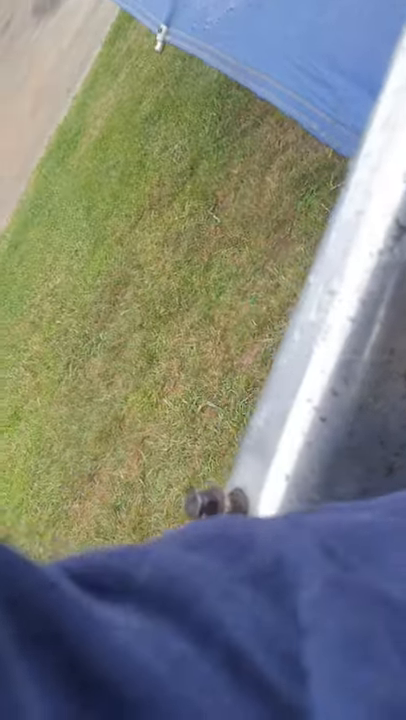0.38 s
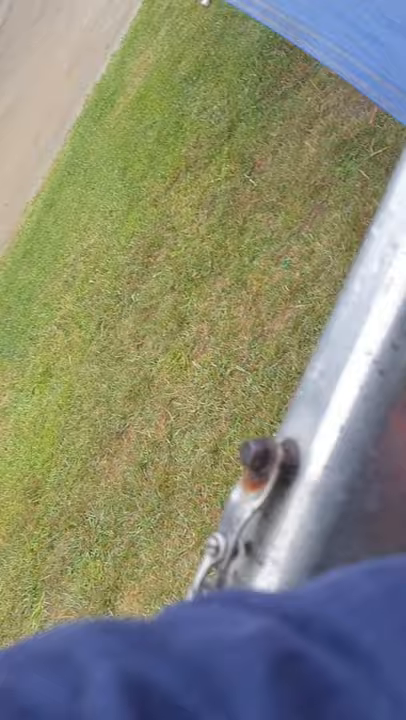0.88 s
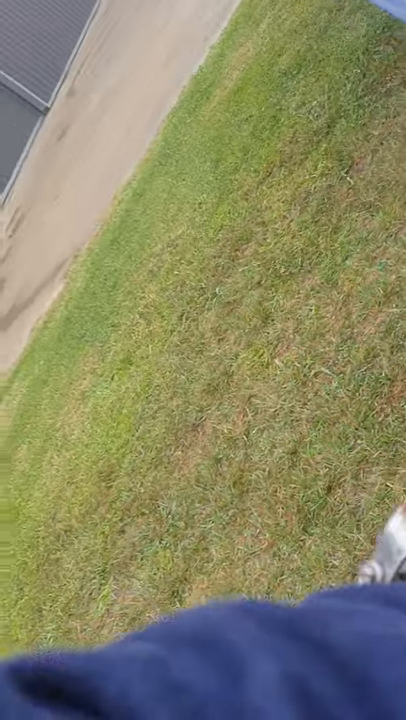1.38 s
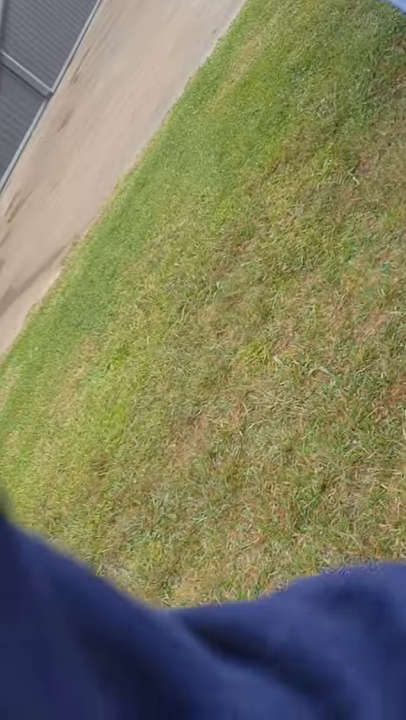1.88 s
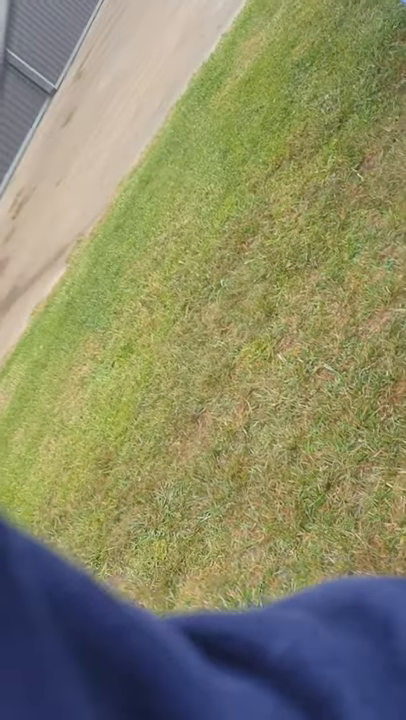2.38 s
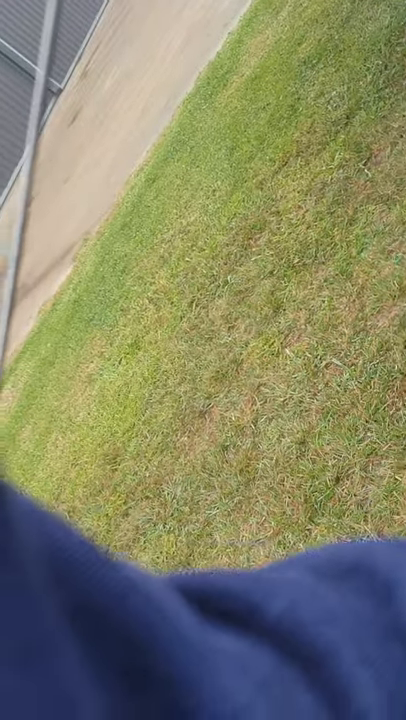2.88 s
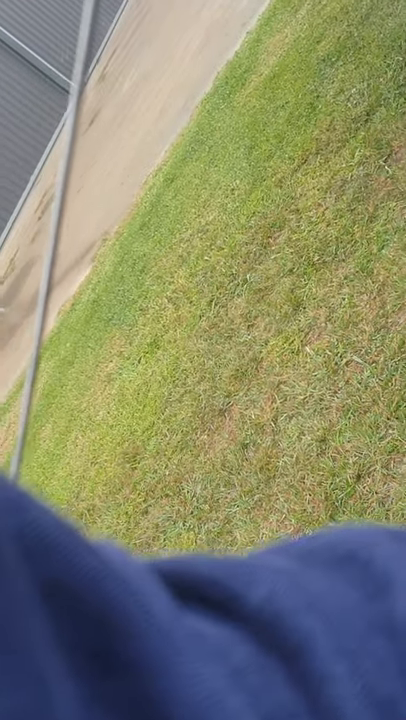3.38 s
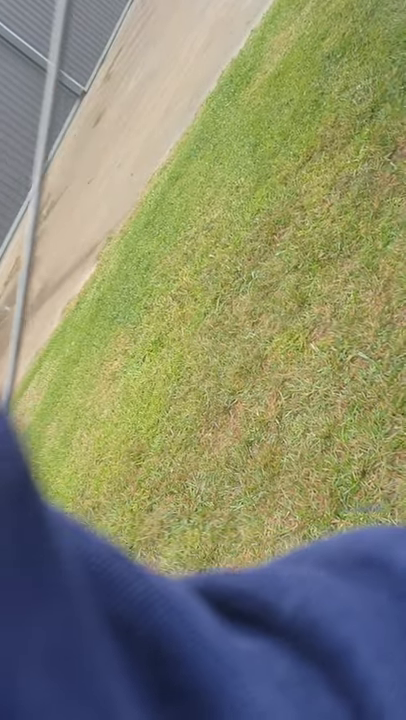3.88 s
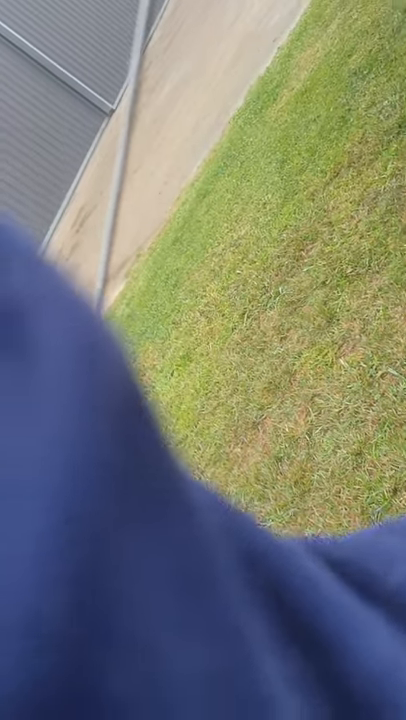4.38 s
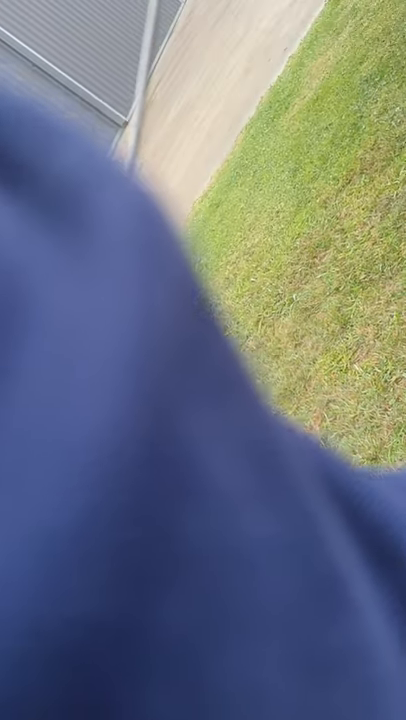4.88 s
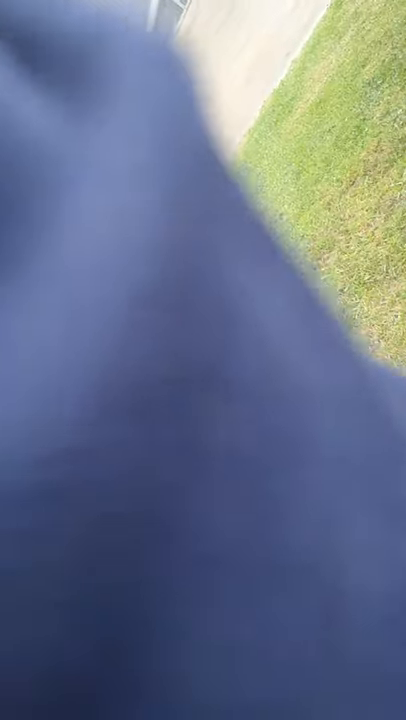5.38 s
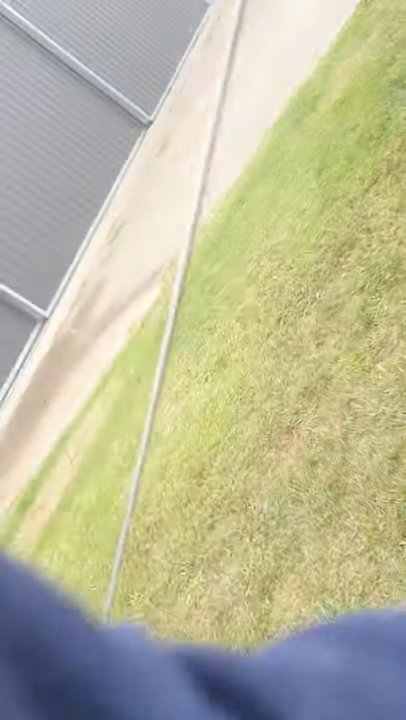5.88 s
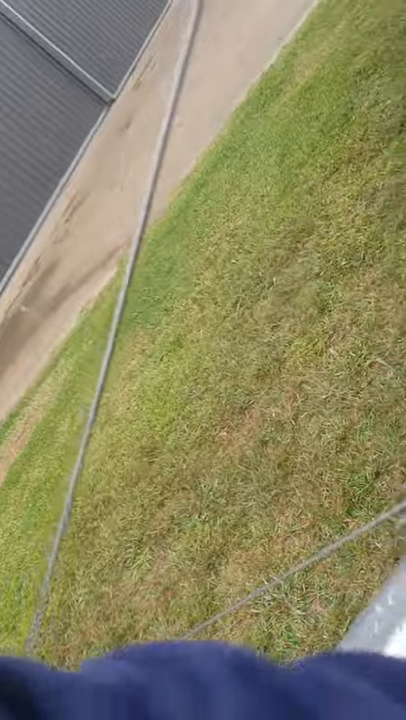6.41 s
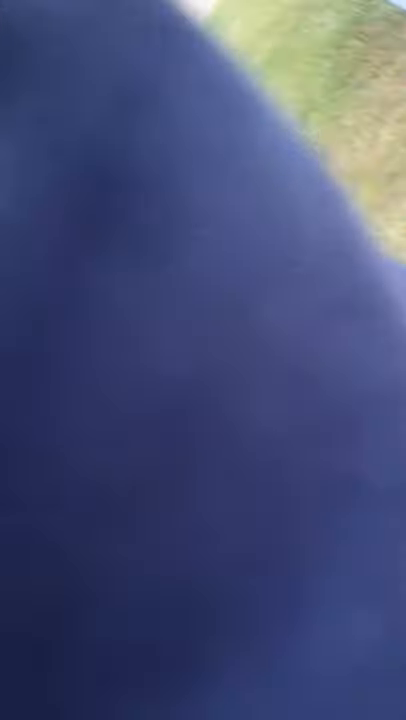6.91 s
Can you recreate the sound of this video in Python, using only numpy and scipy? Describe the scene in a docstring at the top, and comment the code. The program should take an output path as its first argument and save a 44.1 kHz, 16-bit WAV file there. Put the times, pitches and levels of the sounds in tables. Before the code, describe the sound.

Outdoors, a constant low motor hum with a rattling cover runs under bumps, creaky crackles and sleeve rustle, then sharp bright clinks near the end.

```python
"""Small engine and a handled metal frame

A small four-stroke engine drones steadily across a lawn, as cosines on its shaft orders, with a puff of gas each turn.
The puffs, enveloped noise, rattle a loose cover. Someone wearing the recorder handles a metal tube frame:
the recorder's case creaks in slips (ringing modes and noise bursts) and a sleeve rubs past the ports (swelling noise).
A small metal fitting clinks close to the left port (high modes together with a crack of noise).
High noise swells and fades, over a steady machine and outdoor hiss.
"""
import sys
import numpy as np
from scipy import signal
from scipy.fft import rfft, irfft
from scipy.io import wavfile
from scipy.ndimage import uniform_filter1d

SR = 44100
rng = np.random.default_rng(int(sys.argv[2]) if len(sys.argv) > 2 else 0)


def voltage_ratio(level):
    """Linear amplitude factor for a level in decibels (scalar or array-like)."""
    return 10 ** (np.asarray(level, float) / 20)


def transcribe(u):
    """Save the signal u as a 16-bit wav file named by the first command-line argument.

    u: samples, shape (n,) or (channels, n), limited to [-1, 1]; the rate is SR.
    q: integer samples, one column per channel.
    """
    v = np.clip(np.atleast_2d(u).T, -1, 1)
    q = np.round(v * 32767).astype(np.int16)
    wavfile.write(sys.argv[1], SR, q)


N = 309574
T = np.arange(N) / SR
HZ = np.maximum(np.linspace(0, SR / 2, 2049), 1)  # frequency grid of the noise filters

# Every *_COLOUR table is a relative noise spectrum: frequency_hz, density_db.
# Every *_SIDE table is the part unrelated between the ports: frequency_hz, side_re_mid_db.
# Every *_PAN table is the balance of the ports: frequency_hz, left_minus_right_db.

# Shaft speed: time_s, turns_hz
SHAFT_SPEED = [(0.0, 47.74), (0.35, 47.79), (1.05, 47.71), (1.4, 47.8), (2.1, 47.73), (2.8, 47.87),
               (3.15, 47.84), (3.5, 47.99), (4.2, 48.01), (4.55, 47.82), (4.9, 47.95), (5.6, 47.99),
               (5.95, 47.96), (6.3, 48.16), (7.0, 48.15)]
# Drone levels: time_s, first_order_db, second_order_db, upper_orders_db
ORDER_LEVELS = [(0.0, -30, -27.5, -39.5), (1.0, -27.5, -25.5, -33.5), (1.5, -27, -25.5, -34.5),
                (2.6, -25.5, -24.5, -33.5), (3.5, -25.5, -22.5, -33), (4.0, -26.5, -22, -35),
                (5.0, -26, -23.5, -32), (6.1, -27, -22, -36.5), (7.0, -28, -22.5, -32.5)]
# Weaker orders, the halves from firing every second turn: shaft_multiple, level_re_upper_db, unsteadiness (0-1)
UPPER_ORDERS = [(1.5, -9, 1), (2.5, -7.5, 0.79), (3, -5.5, 0.6), (3.5, -9, 0.4), (4, -5.5, 0.37),
                (4.5, -17, 0.95), (5, -10, 0.56), (6, -20, 0.77), (7, -23, 0.76)]
# Levels of the exhaust puffs before their envelopes, and of the steady machine and outdoor hiss:
# time_s, puff_db, steady_hiss_db
PUFF_AND_HISS_LEVELS = [(0.0, -35, -36), (0.6, -35.5, -36), (1.2, -30.5, -33.5), (2.1, -33, -36),
                        (2.93, -33, -36), (3.28, -34.5, -36.5), (4.3, -33.5, -36), (4.65, -37, -36),
                        (5.8, -35.5, -37), (6.57, -35.5, -35.5), (7.02, -38, -35.5)]
# Low and high parts of a puff
BARK_COLOUR = [(60, -47), (250, -22), (500, -19), (1200, -6.5), (1710, 0), (2000, -3), (2420, -1.5),
               (2950, -13.5), (3600, -32), (6000, -66)]
FIZZ_COLOUR = [(1200, -44), (2300, -13), (3380, 6), (4500, -4.5), (5500, -2.5), (6200, -14), (7500, -4.5),
               (8500, -13.5), (11000, -18), (12500, -35)]
# Steady machine and outdoor hiss
HISS_COLOUR = [(76, -22.5), (130, 2), (219, -5.5), (285, -14.5), (342, -10), (472, -23.5), (1400, -37.5),
               (1750, -28), (2410, -31.5), (3200, -33), (4240, -34.5), (7750, -44), (16000, -90)]
# Stereo of distant sound
DISTANT_SIDE = [(100, -19), (300, -16.5), (700, -6), (1400, -4), (2400, -6.5), (5000, 2), (10000, -1.5)]
DISTANT_PAN = [(60, 2.5), (110, -1), (200, 3), (380, -1.5), (700, -5.5), (1290, -6), (2380, 2.5),
               (4400, -0.5), (8120, 6.5), (15000, 7)]
# Modes of the loose engine cover: frequency_hz, level_db, t60_s
COVER_MODES = [(1620, -6, 0.028), (2186, -1, 0.029), (2560, -1, .02), (2904, -3, .02), (3320, -3, 0.022),
               (4070, -7, .015)]
# Loudest rattles of the cover, each level driving all its modes: time_s, drive_db
COVER_KNOCKS = [(0.672, -34), (0.733, -36), (0.881, -40), (1.488, -33.5), (2.201, -35.5), (2.242, -35.5),
                (2.807, -37), (2.933, -36), (3.6835, -34), (4.766, -37.5), (6.558, -40)]
# Case slips; hardness tilts the modes: time_s, drive_db, tick_drive_db, hardness_db_per_octave
CASE_SLIPS = [(0.669, -27, -55, 1), (0.732, -30, -58, 10), (0.834, -30, -56, 0.1), (0.923, -23.5, -57, -1),
              (0.953, -27, -55, 0.1), (1.148, -30.5, -54, 7), (1.485, -24.5, -59, -8), (1.57, -40, -46, -6),
              (1.65, -22, -48, 1), (1.655, -15, -46, 3.5), (1.666, -17.5, -41, 5), (1.681, -22, -44, 4),
              (1.701, -9, -41, 1.5), (1.71, -18.5, -46, 5.5), (1.735, -12, -43, 2.5), (1.757, -14, -39, 3),
              (1.764, -18, -47, 5), (1.793, -17.5, -41, 4), (1.828, -8, -40, 1.5), (1.858, -12, -41, 2),
              (1.873, -13.5, -46, 4), (1.882, -13.5, -47, 0.5), (1.889, -25.5, -44, 9.5),
              (1.894, -15.5, -52, 1), (1.924, -17, -51, 1), (2.196, -26, -62, -7), (2.439, -12.5, -37, 4.5),
              (2.451, -18.5, -55, 5.5), (2.515, -23.5, -61, 6.5), (2.545, -27, -52, 7.5),
              (2.578, -26, -64, 5.5), (2.61, -29, -62, 4), (2.636, -28, -60, 4), (2.646, -13, -45, 0.5),
              (2.756, -15.5, -45, 3.5), (3.002, -13, -47, 3), (3.018, -18, -49, -4.5),
              (3.024, -16, -53, -6), (3.034, -19.5, -50, -5), (3.044, -17.5, -50, 3.5),
              (3.306, -25.5, -68, 0), (3.679, -23.5, -59, 5.5), (4.289, -24, -59, 2), (4.367, -27, -62, -3),
              (4.869, -23, -67, -8.5), (5.29, -26, -60, 6), (5.302, -16.5, -60, -2), (5.453, -18.5, -47, 3),
              (5.46, -18.5, -50, -4), (5.47, -22.5, -61, 3), (5.483, -17, -47, -5), (5.496, -15.5, -52, 2),
              (5.509, -27, -53, 4), (5.516, -20, -49, 5), (5.545, -22, -54, 1), (5.678, -20.5, -56, 0),
              (5.733, -12, -48, -3.5), (5.744, -28.5, -58, -5), (6.825, -16, -46, 2.5),
              (6.842, -15, -43, 2), (6.864, -20.5, -54, 2), (6.906, -17.5, -50, 2.5),
              (6.952, -18.5, -60, 3)]
# Modes of the case: frequency_hz, level_db, t60_s
CASE_RESONANCES = [(172, -1, 0.064), (246, 0, 0.032), (349, -1.5, 0.042), (570, -17, 0.014),
                   (426, -8.5, 0.096), (694, -16.5, 0.052), (992, -13.5, 0.048), (1187, -20, 0.049)]
# Noise of a slip: body, grit and tick
SHAKE_COLOUR = [(30, -58), (90, 0.5), (160, -11), (350, 3.5), (560, -22), (950, -14.5), (1300, -20.5),
                (1500, -38), (2300, -34.5), (5000, -37), (6500, -52.5), (9000, -66), (14000, -58)]
GRIT_COLOUR = [(100, -50), (500, -11), (900, 9.5), (1400, 5), (2500, 3), (5000, -2.5), (6500, -23),
               (12000, -53)]
TICK_COLOUR = [(800, -52), (3000, -12), (6000, 0), (8500, -2), (10500, -6.5), (13000, 0.5), (15800, -13)]
# Stereo of the case
BODY_SIDE = [(60, -29), (110, -14), (200, -18), (380, -12.5), (700, 2.5), (1290, 0), (2380, -2), (4400, -3),
             (8120, 16), (15000, -10)]
BODY_PAN = [(60, 4), (110, 15), (200, 3.5), (380, 2), (700, 2), (1290, 2.5), (2380, -3.5), (4400, 5),
            (8120, 16), (15000, 27)]
# Metal clinks: time_s, drive_db, left_minus_right_db, modes_near_9khz_db, modes_near_13khz_db
FITTING_CLINKS = [(6.4932, -20.5, 26, 3, -2), (6.4943, -43, 10, -3, -2), (6.508, -32, 4, -17, -17),
                  (6.514, -31, 7, -16, -16), (6.5278, -23.5, 24, -22, -20), (6.553, -37, 11, -21, -18),
                  (6.5953, -36, 7, -10, -11), (6.6952, -30, 8, -5, -2), (6.7124, -39, 6, -8, -9),
                  (6.8064, -28, 10, -12, -2), (6.8443, -33, 13, -8, -4), (6.8643, -36, 14, -16, 1),
                  (6.8962, -45.5, 3.5, -20, -19)]
# Modes of the fitting: frequency_hz, level_db, t60_s
FITTING_MODES = [(2760, -12, 0.035), (3720, -8, .015), (5200, -7, 0.014), (5540, 2.5, 0.026),
                 (6050, -12, .04), (8800, -5, 0.052), (9270, 6.5, 0.0097), (13200, 0, 0.046),
                 (13300, -12, 0.13), (13800, 1, .022), (13000, -1, .045), (15550, -22, .04)]
CRACK_COLOUR = [(300, -57), (1500, -27), (3000, 13), (6000, 4.0), (12000, -0.5), (16000, 0.0)]
# Sleeve strokes over the ports: full_level_s, hold_s, rub_db, scuff_db
SLEEVE_STROKES = [(0.0, 0.026, -47, -49.5), (0.214, 0.16, -52, -50), (0.817, .04, -41, -49),
                  (0.906, 0.076, -39.5, -48), (1.138, 0.016, -58, -45), (1.307, 0.023, -56, -45.5),
                  (1.55, 0.034, -46, -50), (1.647, 0.23, -38.5, -44.5), (1.91, .06, -43.5, -54),
                  (2.43, .06, -42, -53), (2.54, 0.13, -42.5, -54), (3.002, .1, -42.5, -53),
                  (3.52, .07, -45.5, -47.5), (4.248, 0.23, -49, -47.5), (4.69, 0.14, -51, -49.5),
                  (4.853, 0.15, -49, -48), (5.25, 0.13, -44.5, -46.5), (5.505, .02, -35.5, -49),
                  (5.695, 0.1, -45, -51), (5.86, .01, -45, -51), (5.986, 0.022, -45, -47.5),
                  (6.147, 0.047, -47, -49), (6.647, 0.019, -36.5, -43), (6.706, 0.035, -41, -47),
                  (6.85, .05, -45, -49.5), (7.003, .02, -47, -54)]
# Low and grainy parts of a stroke
LOW_RUB_COLOUR = [(60, -50), (150, -9), (300, 7), (480, 5.5), (650, -3.5), (1200, -29), (4000, -67)]
CLOTH_SCUFF_COLOUR = [(100, -59), (400, -10.5), (750, 2.5), (1150, 3), (1450, -1.5), (2300, -8),
                      (6000, -24), (10000, -61)]
# High noise swells: full_level_s, hold_s, level_db, left_minus_right_db
HIGH_SWELLS = [(0.0, .02, -67, 1), (0.202, 0.17, -66, 0), (.55, 0.49, -65, 2), (1.14, 0.34, -66, 8),
               (1.66, 0.18, -66, 9), (3.6, .06, -74, 2), (4.33, .13, -67, 0), (4.977, .06, -67, 1),
               (5.28, .13, -69, 1), (6.082, .15, -65.5, 8), (6.45, .02, -67, 15), (6.6, 0.096, -61, 0),
               (6.87, .03, -70, 17)]
HIGH_COLOUR = [(1500, -51), (4000, -12), (9000, -8), (13000, -3.5), (16000, -12)]
# Thin hiss that comes and goes, before its balance to the left: full_level_s, hold_s, level_db
THIN_SWELLS = [(.22, 0.8, -72), (1.15, 0.28, -70), (1.55, .25, -78), (3.7, .5, -83.5), (5.0, .4, -78),
               (6.7, .03, -78)]
THIN_COLOUR = [(8500, -45), (10200, -1.5), (10800, -1), (11300, 0.0), (13000, -49.0)]

# samples by which the right port hears drone, distant sound and near metal late
DRONE_LAG, FAR_LAG, NEAR_LAG = 10, 18, 36


def shaft_turns():
    """Kinematics: the shaft angle, in turns, is the time integral of its speed."""
    return np.cumsum(curves(SHAFT_SPEED)[0]) / SR + 0.47


def exhaust_drone(turns):
    """Harmonic series: a periodic engine sounds on multiples of its shaft speed, with halves from firing."""
    first_db, second_db, upper_db = curves(ORDER_LEVELS)
    angle = 2 * np.pi * turns
    first = voltage_ratio(first_db + 1.4 * walk(4.7)) * np.cos(angle)
    second = voltage_ratio(second_db + 1.48 * walk(7.8)) * np.cos(2 * angle - 0.45)
    drone = first + second
    for multiple, db, unsteadiness in UPPER_ORDERS:
        # firings differ, so weak orders waver in size and phase; the non-even ones lead
        phase = multiple * angle + 1.23 * (multiple % 2 > 0)
        in_phase = (1 + unsteadiness * walk(22)) * np.cos(phase)
        quadrature = unsteadiness * walk(22) * np.sin(phase)
        drone = drone + voltage_ratio(upper_db + db) * (in_phase + quadrature)
    balance = voltage_ratio(np.array([[0.9], [-0.9]]))
    return delayed(-np.sqrt(2) * drone * balance, DRONE_LAG)  # sqrt(2) turns rms levels into peaks


def exhaust_puffs(valve):
    """Jet noise: gas released once a turn is turbulent, with a low bark and a weaker, higher fizz."""
    puff_db = curves(PUFF_AND_HISS_LEVELS)[0]
    bark = puff(valve, puff_db, BARK_COLOUR, fade=0.13)
    fizz = puff(valve, puff_db - 6, FIZZ_COLOUR, fade=0.18)
    return delayed(bark + fizz, FAR_LAG)


def puff(valve, db, spectrum, fade):
    """Modulated noise: each turn gates one burst of random size; fade is its decay constant in turns."""
    scatter_db = 2.6  # rms spread of sizes
    sizes = voltage_ratio(scatter_db * rng.uniform(-np.sqrt(3), np.sqrt(3), 400))
    since = valve % 1
    gate = sizes[valve.astype(int)] * np.exp(-since / fade) * (1 - np.exp(-since / 0.1))
    return stereo(gate * voltage_ratio(db), spectrum, DISTANT_SIDE, [(300, -2.1), (3000, -0.092), (8000, 1.0)])


def loose_cover(valve):
    """Forced impact: every puff pings the cover's modes, with their levels and tuning redrawn each time."""
    lag_s, drive_db, pan_db = 0.001, -12, 0.5  # lag and drive against the puff
    puff_db = curves(PUFF_AND_HISS_LEVELS)[0]
    opening = np.flatnonzero(np.diff(np.floor(valve)))
    luck_db = rng.uniform(-4, 4, 400)[:len(opening)]
    knock_s, knock_db = np.transpose(COVER_KNOCKS)
    times = np.append(T[opening] + lag_s, knock_s)
    db = np.append(puff_db[opening] + drive_db + luck_db, knock_db)
    gains = voltage_ratio(db[:, None] + pan_db * np.array([0.5, -0.5]))
    even_colour = np.zeros((len(times), len(COVER_MODES)))
    ring = rings(times, gains, COVER_MODES, even_colour, spread_db=3.0, detune=0.081)
    return delayed(ring, FAR_LAG)


def case():
    """Stick-slip: each slip rings and shakes the case and ticks near the left port; hard slips are brighter."""
    times, db, tick_db, hardness = np.transpose(CASE_SLIPS)
    slope_db = np.outer(hardness, np.log2(np.transpose(CASE_RESONANCES)[0] / 450))
    gains = voltage_ratio(db[:, None] - 9.5 + np.array([0.7, -0.7]))
    ring = rings(times, gains, CASE_RESONANCES, slope_db, spread_db=2.0, detune=0.045)
    shake = stereo(bursts(times, db - 8.0, t60=0.062), SHAKE_COLOUR, BODY_SIDE, BODY_PAN)
    grit_envelope = bursts(times, db - 27.5 + 2 * hardness, t60=0.04)
    grit = stereo(grit_envelope, GRIT_COLOUR, [(1000, 0)], BODY_PAN)
    tick_envelope = bursts(times, tick_db, t60=0.017, rise=0.0001)
    tick = stereo(tick_envelope, TICK_COLOUR, [(1000, -9)], [(5000, 4), (9000, 12)])
    return -ring + shake + grit + delayed(tick, NEAR_LAG)


def fitting():
    """Modal excitation: a noise crack and a ring start together; the striking place sets the upper modes' share."""
    times, db, pan_db, mid_db, top_db = np.transpose(FITTING_CLINKS)
    hz = np.transpose(FITTING_MODES)[0]
    share_db = np.outer(mid_db, (hz > 7000) & (hz < 11000)) + np.outer(top_db, hz > 11000)
    gains = voltage_ratio(np.array([db, db - pan_db]).T)
    ring = rings(times, gains, FITTING_MODES, share_db, spread_db=-1.0, detune=0.0038)
    crack_envelope = bursts(times, db - 14.0, t60=0.061, rise=0.0001)
    crack_pan = [(2000, 1.1), (5000, 4.6), (9000, 14.6)]
    crack = stereo(crack_envelope, CRACK_COLOUR, [(1000, 3.5)], crack_pan)
    return delayed(ring + crack, NEAR_LAG)


def sleeve():
    """Friction noise: cloth dragged over the ports gives a low rub and a scuff that share one grain."""
    start, hold, rub_db, scuff_db = np.transpose(SLEEVE_STROKES)
    grain = voltage_ratio(2 * walk(70))
    slopes = dict(rise_db_s=193, fall_db_s=153)
    rub_level = grain * swells(start, hold, rub_db, rest_db=-52.5, **slopes).max(0)
    scuff_level = grain * swells(start, hold, scuff_db, rest_db=-55, **slopes).max(0)
    rub = stereo(rub_level, LOW_RUB_COLOUR, BODY_SIDE, [(300, 1.0), (700, -6.5)])
    scuff = stereo(scuff_level, CLOTH_SCUFF_COLOUR, [(1000, 1.3)], [(700, -7.5), (1300, -3.0)])
    return rub + scuff


def high_noise():
    """Band-limited noise: high, fast-flickering noise that swells and fades, each swell with its own balance."""
    start, hold, db, pan_db = np.transpose(HIGH_SWELLS)
    gains = swells(start, hold, db, rest_db=-75.5, rise_db_s=100, fall_db_s=100)
    rest_pan_db = 3
    pan_db = np.append(pan_db, rest_pan_db) @ gains / gains.sum(0)  # weighted by the gains
    level = gains.max(0) * voltage_ratio(2.0 * walk(290))
    noise = stereo(level, HIGH_COLOUR, [(1000, 0)], [(1000, 0)])
    return noise * voltage_ratio(np.array([pan_db, -pan_db]) / 2)


def thin_hiss():
    """Band-limited noise: a narrow high hiss at the left port comes and goes."""
    start, hold, db = np.transpose(THIN_SWELLS)
    level = swells(start, hold, db, rest_db=-83.5, rise_db_s=72, fall_db_s=72).max(0)
    return stereo(level * voltage_ratio(2.0 * walk(30)), THIN_COLOUR, [(1000, 0)], [(1000, 18.8)])


def steady_hiss():
    """Broadband noise: machine and outdoor hiss, wavering slowly and partly unrelated between the ports."""
    hiss_db = curves(PUFF_AND_HISS_LEVELS)[1]
    hiss = stereo(voltage_ratio(hiss_db + walk(6)), HISS_COLOUR, DISTANT_SIDE, DISTANT_PAN)
    return delayed(hiss, FAR_LAG)


def rings(times, gains, modes, colour_db, spread_db, detune):
    """Modal superposition: each blow sums decaying sines; gains are (left, right), colour_db one per mode."""
    out = np.zeros((2, N + 4000))
    t = np.arange(4000) / SR
    hz, db, t60 = np.transpose(modes)[:, :, None]
    chance = rng.standard_normal((len(times), 2, len(modes), 1))
    for s, gain, extra_db, (level_draw, pitch_draw) in zip(times, gains, colour_db, chance):
        decay = voltage_ratio(db + extra_db[:, None] + spread_db * level_draw - 60 * t / t60)
        ring = decay * np.sin(2 * np.pi * hz * (1 + detune * pitch_draw) * t)
        i = int(s * SR)
        out[:, i:i + len(t)] += gain[:, None] * ring.sum(0)
    return out[:, :N]


def bursts(times, db, t60, rise=0.00074):
    """Exponential decay: a sum of envelopes that jump up and die away; t60 and rise in seconds."""
    out = np.zeros(N + 4000)
    t = np.arange(4000) / SR
    for s, level_db in zip(times, db):
        i = int(s * SR)
        out[i:i + len(t)] += voltage_ratio(level_db - 60 * t / max(t60, 0.003)) * (1 - np.exp(-t / rise))
    return out[:N]


def swells(start, hold, db, rest_db, rise_db_s, fall_db_s):
    """Linear decibel slopes: one gain row per swell (rise, hold, fall), and a last row at rest."""
    early = start[:, None] - T
    late = T - (start + hold)[:, None]
    gains = voltage_ratio(db[:, None] - rise_db_s * np.maximum(early, 0) - fall_db_s * np.maximum(late, 0))
    return np.vstack([gains, voltage_ratio(rest_db) + 0 * T])


def stereo(envelope, spectrum, side, pan):
    """Interaural coherence: unrelated mid and side noises, coloured, then balanced left to right."""
    db = at(spectrum, HZ)
    db = db - 10 * np.log10(np.mean(voltage_ratio(2 * db)))  # unit mean power
    mid_noise, side_noise = envelope * rng.standard_normal((2, N))
    ports = []
    for sign in (1, -1):
        tilt = sign * at(pan, HZ) / 2
        mid = colour(mid_noise, db + tilt)
        ports.append(mid + sign * colour(side_noise, db + tilt + at(side, HZ)))
    return np.array(ports)


def colour(x, db):
    """Minimum phase: folding the cepstrum makes a causal filter with the gains db on the grid HZ."""
    cepstrum = irfft(db * np.log(10) / 20)
    cepstrum[1:len(HZ) - 1] *= 2
    cepstrum[len(HZ):] = 0
    return signal.oaconvolve(x, irfft(np.exp(rfft(cepstrum))))[:N]


def delayed(pair, lag):
    """Arrival-time difference: the right port hears the sound lag samples later."""
    return np.array([pair[0], np.roll(pair[1], lag)])


def walk(rate):
    """Low-passed chance: random levels held 1 / rate s and smoothed twice; spread near 1."""
    k = int(SR / rate)
    steps = np.repeat(rng.standard_normal(N // k + 1), k)
    return 1.18 * uniform_filter1d(uniform_filter1d(steps, k), k)[:N]


def curves(table):
    """Linear interpolation: the columns of a time table, one value per sample."""
    s, *columns = np.transpose(table)
    return [np.interp(T, s, column) for column in columns]


def at(points, hz):
    """Logarithmic frequency: a spectrum in dB is read along a log axis."""
    f, db = np.transpose(points)
    return np.interp(np.log(hz), np.log(f), db)


def scene():
    """Superposition: the sound pressures of all sources add in the open air."""
    turns = shaft_turns()
    valve = turns + 0.535  # a puff begins at each whole number
    engine = exhaust_drone(turns) + exhaust_puffs(valve) + loose_cover(valve)
    near = case() + fitting() + sleeve() + high_noise() + thin_hiss()
    return engine + near + steady_hiss()


def top_cut(x):
    """Nothing passes above the cut-off."""
    return signal.sosfilt(signal.butter(12, 16860, fs=SR, output="sos"), x)


def record(dry):
    """Band limiting: a steep elliptic low-pass removes the sound above 15.9 kHz."""
    low_pass = signal.ellip(8, 0.2, 60, 15900, fs=SR, output="sos")
    mix = signal.sosfilt(low_pass, dry)
    return top_cut(mix)


dry = scene()
out = record(dry)
transcribe(out)
```